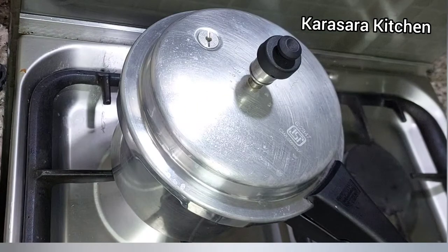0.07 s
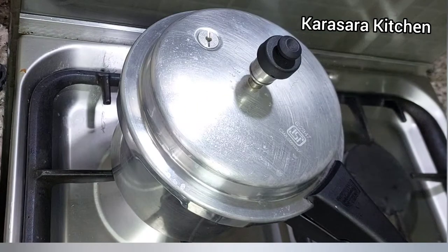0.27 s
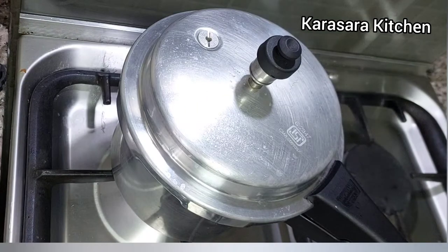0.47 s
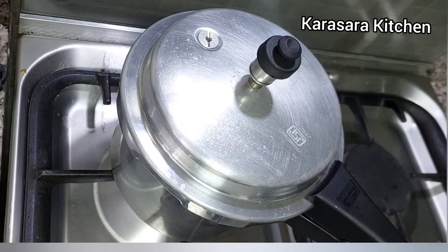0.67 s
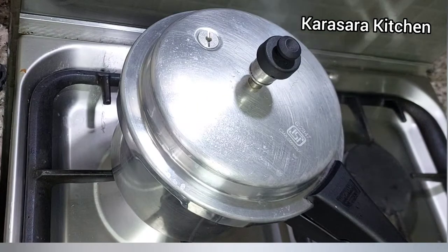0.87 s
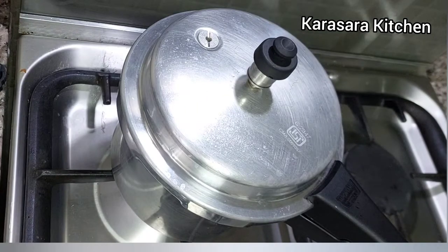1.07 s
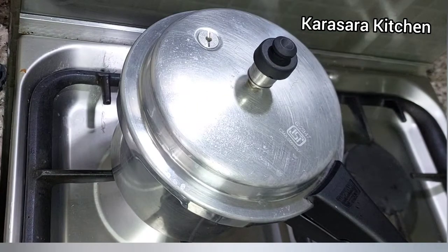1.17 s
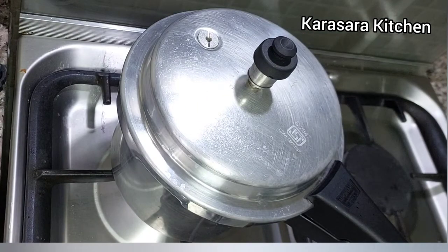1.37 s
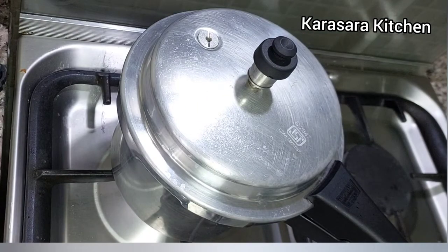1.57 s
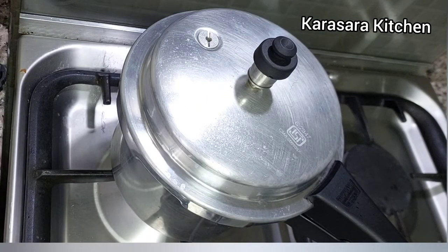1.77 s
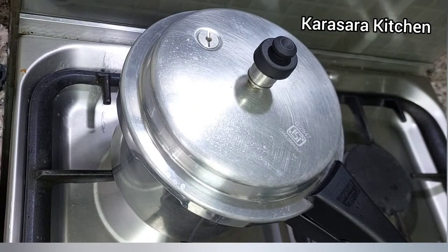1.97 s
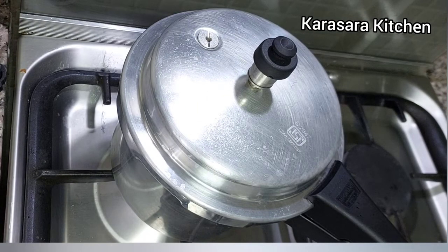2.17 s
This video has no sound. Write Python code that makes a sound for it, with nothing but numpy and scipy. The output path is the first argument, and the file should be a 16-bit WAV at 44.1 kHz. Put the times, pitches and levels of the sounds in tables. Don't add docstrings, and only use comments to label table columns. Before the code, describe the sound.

A pressure cooker vents a loud, sharp steam hiss from the start for about a second, then the weight falls, rattling metallically on the lid; a brief kitchen echo fades into faint hum and rumble, heard close in stereo.

```python
import sys
import numpy as np
from scipy import signal
from scipy.fft import rfft, irfft, next_fast_len
from scipy.io import wavfile
from scipy.ndimage import uniform_filter1d

SR = 44100
rng = np.random.default_rng(int(sys.argv[2]) if len(sys.argv) > 2 else 0)


def dump(signal):
    limited = np.clip(np.atleast_2d(signal).T, -1, 1)
    pcm = np.round(limited * 32767).astype(np.int16)
    wavfile.write(sys.argv[1], SR, pcm)


def linear_from_db(decibels):
    return 10 ** (np.asarray(decibels, float) / 20)


N = 97328


def evened(x):
    return x / np.sqrt(np.mean(x ** 2) + 1e-20)


def read(points, hz):
    f, value = np.transpose(points)
    return np.interp(np.log(hz + 1), np.log(f + 1), value)


def along(rows, column=1):
    return np.interp(np.arange(N) / SR, [r[0] for r in rows], [r[column] for r in rows])


def hiss(colour_db, likeness, patchy_db):
    size = 2048
    frames, hz = 4 * N // size + 5, np.fft.rfftfreq(size, 1 / SR)
    a, b, c, d, patches = rng.standard_normal((frames, len(hz), 5)).T
    patches = uniform_filter1d(patches, size=14, axis=0)
    patches = evened(uniform_filter1d(patches, size=7, axis=1))
    like = np.clip(likeness(hz), -1, 1)[:, None]
    left = a + 1j * b
    right = like * left + np.sqrt(1 - like ** 2) * (c + 1j * d)
    spectra = np.array([left, right]) * linear_from_db(colour_db(hz)[:, None] + patchy_db * patches)
    return signal.istft(spectra, nperseg=size, noverlap=3 * size // 4)[1][:, :N]


# time in seconds, level in dB.
STEAM_FLOW = [(0, -24.5), (.02, -25.5), (.2, -26), (.39, -26), (.415, -31), (.47, -26), (.62, -27),
              (.8, -26), (.87, -26), (.97, -28.5), (1.02, -27.5), (1.05, -43), (1.085, -56), (1.13, -77)]
# frequency in Hz, density in dB per Hz.
JET_COLOUR = [(300, -31.5), (900, -23.5), (1500, -23.5), (1700, -19), (3000, -15), (5000, -8), (8800, -1.5),
              (15700, -3.5)]
CAVITY_HZ = [2000, 5600, 7420, 8540, 8770, 9120, 9870, 10400, 10800, 11700, 12100, 12700, 15000, 15680]
# width in Hz, boost in dB.
CAVITY_SHAPES = [(250, 3), (400, 2.3), (80, 8), (40, 6), (70, 9), (50, 2.5), (140, 4), (80, 2.8),
                 (240, 3.2), (86, 6), (110, 4.5), (250, 3.6), (200, 1.5), (80, 1)]


def steam():
    patchy_db, flicker_db = 0.9, 1.01

    def colour_db(hz):
        total_db = read(JET_COLOUR, hz)
        for centre_hz, (width_hz, boost_db) in zip(CAVITY_HZ, CAVITY_SHAPES):
            total_db = total_db + boost_db * np.exp(-((hz - centre_hz) / width_hz) ** 2)
        return total_db

    jet = hiss(colour_db, np.ones_like, patchy_db)[0]
    flicker = uniform_filter1d(rng.standard_normal(N), size=120)
    flicker = evened(uniform_filter1d(flicker, size=120))
    return evened(jet) * linear_from_db(along(STEAM_FLOW) + flicker_db * flicker)


# frequency in Hz, t60 in seconds.
KITCHEN_T60 = [(300, 0.68), (1500, 0.79), (4000, 0.57), (9000, 0.4), (15000, 0.41)]
# frequency in Hz, lead of the left in radians.
LEFT_LEAD = [(200, 0.35), (900, 0.27), (1600, .9), (2300, 1.4), (6000, 1.79), (9000, 1.5), (15000, 1.4)]


def near_reflections():
    near_db, near_t60_s = -12.5, 0.086
    taps = np.zeros(4096)
    at = np.arange(10, 4096, 20)
    at = np.minimum(at + rng.integers(0, 20, len(at)), 4095)
    taps[at] = rng.choice([-1., 1.], len(at)) * (rng.random(len(at)) < .4)
    taps *= linear_from_db(near_db - 60 * np.arange(4096) / SR / near_t60_s)
    taps[0] = 1
    lead = read(LEFT_LEAD, np.fft.rfftfreq(4096, 1 / SR)) / 2
    spectrum = rfft(np.roll(taps, 128)) * np.exp(1j * np.array([lead, -lead]))
    return irfft(spectrum / np.sqrt(uniform_filter1d(abs(spectrum) ** 2, size=7)))


def far_tails():
    span = 3 * SR // 5
    taps = np.zeros((3, 2, span))
    at = np.arange(400, span - 20, 20) + rng.integers(0, 20, (3, 2, (span - 401) // 20))
    np.put_along_axis(taps, at, rng.choice([-1., 1.], at.shape), 2)
    hz, t, z = signal.stft(taps, SR, nperseg=256)
    decay = linear_from_db(-60 * t / read(KITCHEN_T60, hz)[:, None])
    tails = signal.istft(z * decay, SR, nperseg=256)[1]
    return tails / np.linalg.norm(tails[0, 0])


def kitchen(direct, sent):
    sways_per_s = 1.25
    phase = sways_per_s * np.arange(N) / SR + np.arange(3)[:, None] / 3
    turn = np.cos(np.pi * phase) * np.sqrt(2 / 3)
    near = signal.fftconvolve(direct[None], near_reflections(), axes=1)[:, 128:N + 128]
    far = signal.fftconvolve((sent * turn)[:, None], far_tails(), axes=2).sum(0)
    return near + far[:, :N]


# frequency in Hz, left minus right in dB.
SIDE_TILT = [(250, 12), (950, 2.5), (3770, -0.5), (8000, 2), (13000, -2)]


def tilted(x):
    size = next_fast_len(N + SR // 4)
    tilt_db = read(SIDE_TILT, np.fft.rfftfreq(size, 1 / SR)) / 2
    return irfft(rfft(x, size) * linear_from_db(np.array([tilt_db, -tilt_db])), size)[:, :N]


# frequency in Hz, density in dB per Hz.
AIR_COLOUR = [(15, -48.5), (25, -16.5), (59, -2), (107, -19.5), (165, -22.5), (228, -19), (370, -28),
              (435, -36.5), (15700, -65.5)]
# frequency in Hz, left-right likeness.
AIR_LIKENESS = [(60, 0.26), (180, 1), (550, 0.34), (1650, -0.19), (4970, -0.74), (15000, -0.31)]


def room_air():
    level_db, patchy_db = -58.5, 1.1
    air = hiss(lambda hz: read(AIR_COLOUR, hz) - 25 * (hz < 85),
               lambda hz: read(AIR_LIKENESS, hz), patchy_db)
    return linear_from_db(level_db) * evened(air)


def resonate(x, hz, width_hz):
    turn = np.exp(2j * np.pi * np.cumsum(hz * np.ones(x.shape[-1])) / SR)
    r = np.exp(-np.pi * width_hz / SR)
    return 2 * (turn * signal.lfilter([1 - r], [1, -r], x / turn + 1e-18)).real


# centre in Hz, width in Hz, level in dB.
LEAK_BANDS = [(7300, 700, -86), (10500, 1600, -81), (12400, 1400, -83)]


def leak():
    trim_db = -6.5
    white = rng.standard_normal((2, N))
    return sum(linear_from_db(db + trim_db) * evened(resonate(white, hz, width_hz)) for hz, width_hz, db in LEAK_BANDS)


# frequency in Hz, level in dB.
HUM_TONES = [(100, -57.5), (222, -66.5)]


def mains_hum():
    t = np.arange(N) / SR
    return sum(np.sqrt(2) * linear_from_db(db) * np.sin(2 * np.pi * hz * t) for hz, db in HUM_TONES)


# time in seconds, pitch in Hz, level in dB.
RUMBLE_PATH = [(0.0, 55.7, -51.5), (0.13, 53.8, -52.5), (0.58, 55.52, -40), (0.68, 54.9, -53.5),
               (0.94, 52.93, -51.5), (0.99, 54.2, -61), (1.13, 54.86, -45), (1.38, 54.57, -47),
               (1.49, 55.3, -55.5), (1.51, 56.9, -45), (1.7, 56.7, -54.5), (1.81, 50.5, -46.5),
               (1.94, 56.0, -60), (1.98, 56.7, -45), (2.08, 56.2, -57), (2.2, 55.8, -42.5)]


def street_rumble():
    tone = np.sin(2 * np.pi * np.cumsum(along(RUMBLE_PATH)) / SR)
    lumps = rng.standard_normal(N)
    for hz, width_hz in [(46, 24), (46, 24), (62, 24)]:
        lumps = resonate(lumps, hz, width_hz)
    return linear_from_db(along(RUMBLE_PATH, column=2)) * (1.1 * tone + 0.51 * evened(lumps))


def clicks(times_s, levels_db):
    out = np.zeros(N)
    out[np.round(np.array(times_s) * SR).astype(int)] = linear_from_db(np.array(levels_db))
    return out


def soft_taps(times_s, levels_db):
    t = np.arange(SR // 4) / SR
    tap = np.exp(-t / 0.00063) * np.sin(2 * np.pi * 480 * t) * np.minimum(t / .0003, 1)
    return signal.oaconvolve(clicks(times_s, levels_db), tap)[:N]


# time in seconds, level in dB.
DROPS = [
    (0.18, -36.5),
    (0.4, -37.5),
    (0.543, -35),
    (0.629, -41),
    (0.709, -40),
    (0.792, -45),
    (1.039, -57),
]


def spat_drops():
    times_s, levels_db = np.transpose(DROPS)
    return soft_taps(times_s, levels_db + 6)


# time in seconds, level in dB, brightness in dB per octave.
WEIGHT_BOUNCES = [(1.056, -47, -23), (1.081, -35.5, 3.5), (1.09, -42, 1), (1.098, -47, 2.5),
                  (1.112, -35, -.5), (1.119, -48.5, -0.5), (1.143, -50, 0), (1.159, -55.5, -7.5),
                  (1.178, -69, -8), (1.195, -53.5, 2), (1.222, -71, 1.5)]
MODE_HZ = [870, 935, 1460, 1800, 2490, 2805, 3740, 4800, 5095, 5580, 5755]
# level in dB, t60 in seconds.
MODE_SHAPES = [(-6, 0.041), (-4, .05), (-7, 0.05), (-8, 0.062), (8, 0.018), (-7, 0.053), (-10, .04),
               (-1, 0.045), (4.5, 0.024), (4, 0.04), (-6, 0.036)]


def bouncing_weight():
    knock_db, knock_t60_s, knock_band_hz = -2, 0.04, [320, 1530]
    mode_spread_db, attack_s = 2.4, 0.0012
    t = np.arange(SR // 4) / SR
    times_s, levels_db, bright_db = np.transpose(WEIGHT_BOUNCES)
    envelope = np.convolve(clicks(times_s, levels_db + knock_db), linear_from_db(-60 * t[:3000] / knock_t60_s))[:N]
    band = signal.butter(2, knock_band_hz, "band", fs=SR)
    out = 4 * signal.lfilter(*band, envelope * rng.standard_normal(N))
    for hz, (db, t60_s) in zip(MODE_HZ, MODE_SHAPES):
        ring = linear_from_db(db - 60 * t / t60_s) * np.sin(2 * np.pi * (hz * t + rng.random()))
        ring *= np.minimum(t / attack_s, 1)
        mix_db = mode_spread_db * rng.standard_normal(len(times_s))
        hits = clicks(times_s, levels_db + bright_db * np.log2(hz / 900) + mix_db)
        out += signal.oaconvolve(hits, ring)[:N]
    return out


# time in seconds, level in dB.
SWISH_LEVEL = [
    (1.2, -66.5),
    (1.4, -69.5),
    (1.56, -63.5),
    (1.71, -69.5),
    (1.75, -81),
    (2.0, -87.5),
    (2.2, -93),
]
SWISH_CENTRES = [800, 960, 1230, 1650, 2110]
# width in Hz, level in dB.
SWISH_SHAPES = [(210, 4), (130, 2.5), (300, 0), (696, 0), (170, -4)]


def far_swish():
    sag_per_s = 0.47
    sag = 1 - sag_per_s * np.clip(np.arange(N) / SR - 1.55, 0, .3)
    white = rng.standard_normal((2, N))
    swish = np.zeros((2, N))
    for hz, (width_hz, db) in zip(SWISH_CENTRES, SWISH_SHAPES):
        band = resonate(resonate(white, hz * sag, width_hz), hz * sag, width_hz)
        swish += linear_from_db(db) * evened(band)
    return linear_from_db(along(SWISH_LEVEL)) * evened(swish)


def last_seating():
    return soft_taps([1.2395], [-31])


def scene():
    jet_wet_db, metal_wet_db = -1, -10.5
    jet = steam() * linear_from_db(3.5)
    metal = (spat_drops() + bouncing_weight() + last_seating()) * linear_from_db(-3.5)
    cooker = kitchen(jet + metal, jet * linear_from_db(jet_wet_db) + metal * linear_from_db(metal_wet_db))
    low = (mains_hum() + street_rumble()) * linear_from_db([[-.6], [.6]])
    return tilted(cooker) + room_air() + leak() + low + far_swish()


def band_limit(x):
    return signal.sosfilt(signal.butter(12, 15730, fs=SR, output="sos"), x)


def record(dry):
    return band_limit(dry)


dry = scene()
out = record(dry)
dump(out)
```